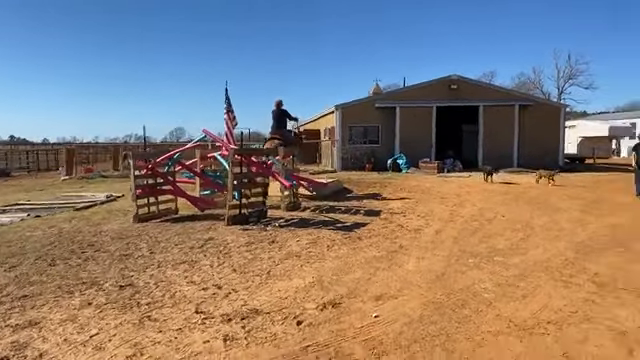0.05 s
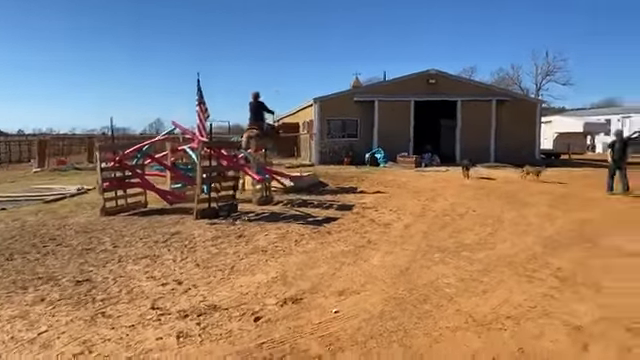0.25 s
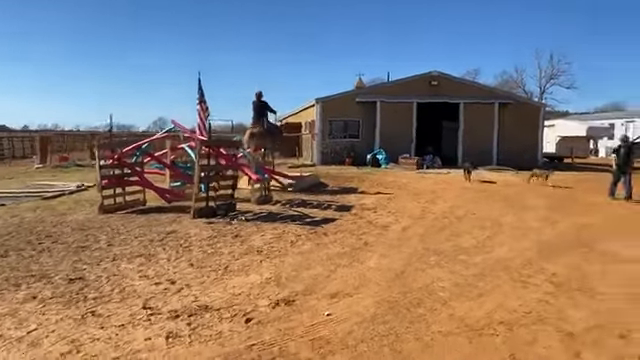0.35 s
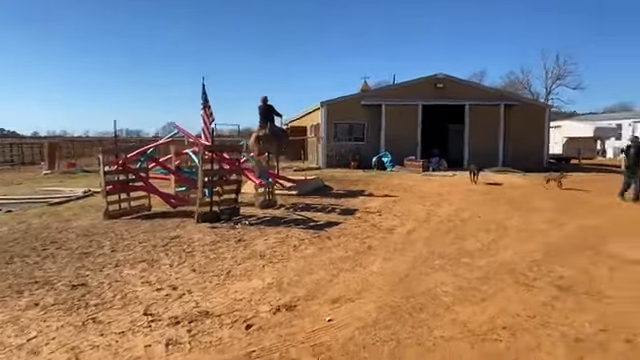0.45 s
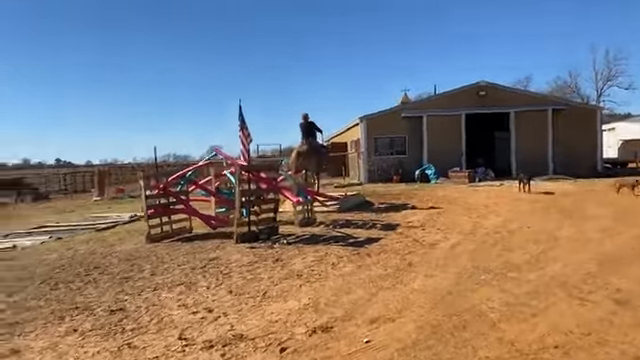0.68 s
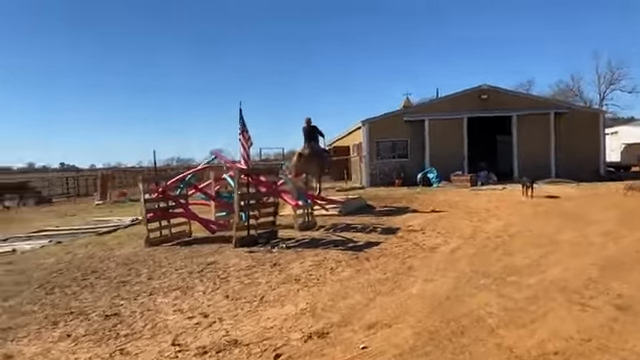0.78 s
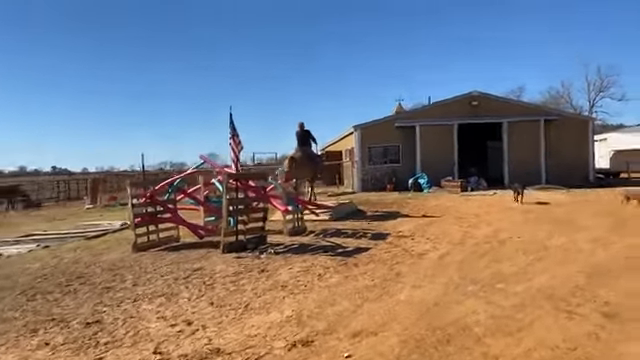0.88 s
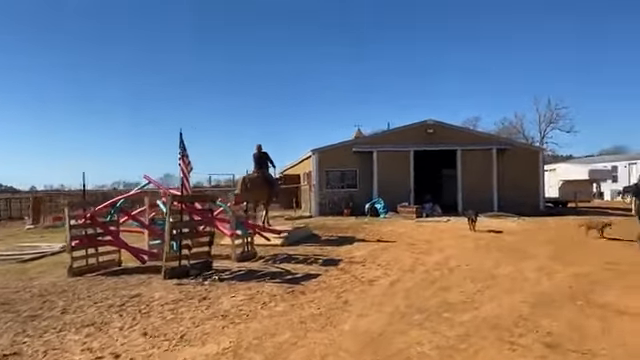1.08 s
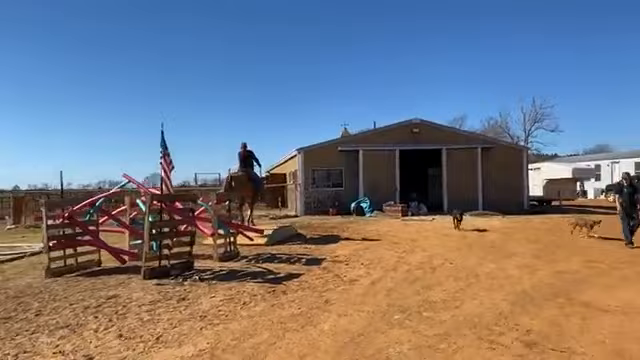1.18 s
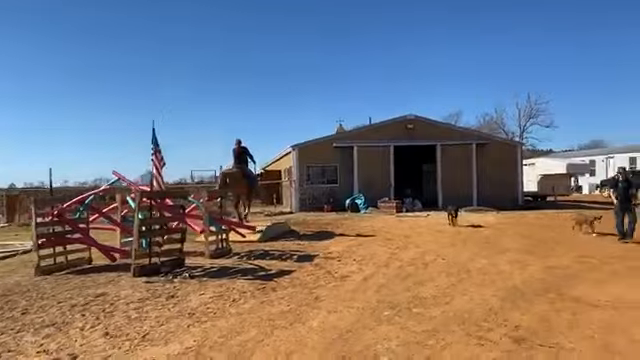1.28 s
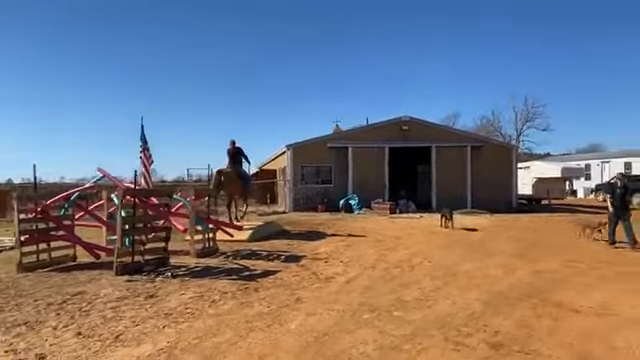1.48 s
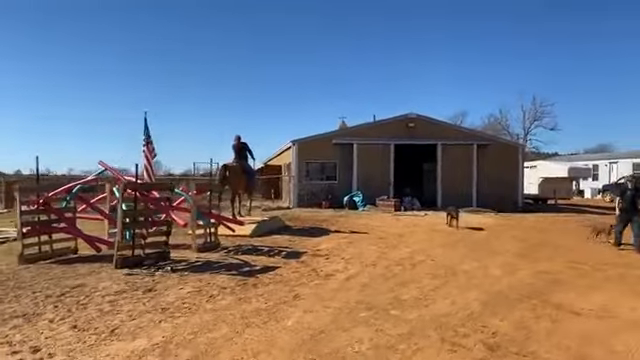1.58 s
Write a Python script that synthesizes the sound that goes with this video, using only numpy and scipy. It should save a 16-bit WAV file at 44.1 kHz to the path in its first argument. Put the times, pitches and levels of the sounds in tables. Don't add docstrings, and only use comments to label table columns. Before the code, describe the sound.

Hooves on hollow planks in an open, dry yard, heard from a distance; a strong boom comes first, weaker clustered steps follow, while tiny gear ticks, a strap snap and a light breeze sound nearer the microphone.

```python
import sys
import numpy as np
from scipy import signal
from scipy.fft import rfft, irfft
from scipy.io import wavfile

SR = 44100
rng = np.random.default_rng(int(sys.argv[2]) if len(sys.argv) > 2 else 0)


def dump(signal):
    limited = np.clip(np.atleast_2d(signal).T, -1, 1)
    pcm = np.round(limited * 32767).astype(np.int16)
    wavfile.write(sys.argv[1], SR, pcm)


def volts_from_db(level):
    exponent = np.asarray(level, float) / 20
    return 10 ** exponent


N = 72765

# (time [s], peak level [dB], pitch [Hz], swell [s], fall [s])
STEPS = [(0.239, -11, 130, 0.02, 0.0029), (.235, -16.5, 176, 0.017, 0.0044),
         (.288, -31, 208, 0.016, 0.0048), (.311, -30, 104, 0.0099, 0.019),
         (0.356, -32.5, 134.5, 0.0082, 0.016), (.396, -40, 115, 0.012, 0.01),
         (.421, -36.5, 118, 0.01, 0.011), (.452, -38.5, 119, 0.013, 0.0057),
         (0.597, -38, 263.6, 0.0087, 0.018), (0.613, -29.5, 253.3, 0.0068, 0.012),
         (0.604, -35, 121, 0.011, .008), (0.621, -29.5, 113.5, 0.0094, 0.0097),
         (0.649, -29.5, 136.5, 0.0094, 0.0033), (.662, -42.5, 244, 0.0069, .008),
         (.676, -36.5, 175.4, 0.0052, 0.0045), (.695, -39, 172, 0.0085, 0.013),
         (0.747, -40, 139, 0.013, 0.012), (0.819, -44.5, 270, 0.0097, 0.0055),
         (.838, -25, 163.5, 0.013, 0.01), (0.856, -30, 150, 0.016, 0.018), (.83, -31.5, 276, 0.012, 0.037),
         (.87, -38, 245, 0.016, 0.021), (0.924, -43, 174, 0.013, 0.016), (1.019, -55.5, 269, 0.012, 0.03),
         (1.198, -36.5, 188.4, 0.029, 0.019), (1.2, -44, 307, 0.0062, 0.014),
         (1.214, -39, 96, 0.0114, 0.022), (1.235, -40, 137, 0.01, 0.0051),
         (1.249, -36, 137, 0.0082, 0.0056), (1.284, -45.5, 130, 0.015, 0.014),
         (1.238, -39, 270.7, 0.0028, 0.028), (1.412, -38.5, 88, 0.0084, 0.009),
         (1.451, -44.5, 104, 0.012, 0.013), (1.516, -36.5, 101, 0.0087, 0.0076),
         (1.504, -39.5, 122, 0.0057, 0.0035), (1.588, -35, 322, 0.0079, 0.0028),
         (1.597, -34.5, 226, 0.0042, 0.0038), (1.599, -34, 130, 0.013, 0.0056),
         (1.611, -35.5, 239.3, 0.0112, .022), (1.623, -39, 130, 0.0097, 0.017)]
TICK_THIN_HZ = 1800


def rms_one(x):
    return x / np.sqrt(np.mean(x ** 2) + 1e-20)


def curve_db(rows):
    return np.interp(np.arange(N) / SR, *np.transpose(rows))


def drift(rate_hz):
    hop, settle = 40, 2000
    r = np.exp(-2 * np.pi * rate_hz * hop / SR)
    raw = rng.standard_normal(N // hop + settle + 2)
    slow = signal.lfilter([1], [1, -2 * r, r * r], raw)[settle:]
    return np.interp(np.arange(N) / hop, np.arange(len(slow)), rms_one(slow))


def ring(x, hz, t60):
    r = volts_from_db(-60 / (abs(t60) * SR))
    w = 2 * np.pi * hz / SR
    return signal.lfilter([0, np.sin(w)], [1, -2 * r * np.cos(w), r * r], x + 1e-18)


def ring_modes(excite, modes):
    return sum((-1) ** k * ring(excite(k), hz, t60) for k, (hz, t60) in enumerate(modes))


def thin(x):
    return signal.sosfilt(signal.butter(2, TICK_THIN_HZ, "high", fs=SR, output="sos"), x)


def coloured(spectrum, patchy_db):
    hz, db = np.transpose(spectrum)
    f = np.maximum(np.fft.rfftfreq(N, 1 / SR), 1)
    tilt_db = np.interp(np.log(f), np.log(hz), db, left=-99, right=-99)
    shaped = rfft(rng.standard_normal(N)) * volts_from_db(tilt_db)
    together = drift(0.5)
    band = np.round(2 * np.log2(f))
    out = np.zeros(N)
    for b in range(9, 29):
        flicker_db = patchy_db * (0.067 * together + drift(26.3))
        out += irfft(shaped * (band == b), N) * volts_from_db(flicker_db)
    return rms_one(out)


def chatter(times, length_s, count):
    k = np.arange(count)
    touches = rng.standard_normal((len(times), count)) * (rng.random((len(times), count)) < 0.15)
    burst = touches * np.exp(-k / (length_s * SR))
    burst[:, 0] = 0.61
    burst /= np.sqrt(np.sum(burst ** 2, axis=1, keepdims=True))
    at = (np.asarray(times) * SR).astype(int)[:, None] + k
    return lambda gains: np.bincount(at.ravel(), (burst * gains[:, None]).ravel(), N + count)[:N]


def booms():
    glide, swell_curve = 0.14, 2.01
    out = np.zeros(N + SR)
    t = np.arange(SR // 4) / SR
    for s, db, hz, swell, fall in STEPS:
        rise = np.abs(np.sin(0.5 * np.pi * t / swell)) ** swell_curve
        decay = np.exp(-np.maximum(t - swell, 0) / fall)
        shape = np.where(t < swell, rise, decay)
        cycles = hz * (t + glide * swell * (1 - np.exp(-t / swell)))
        start = int(s * SR)
        out[start:start + len(t)] += volts_from_db(db) * shape * np.sin(2 * np.pi * cycles)
    return out[:N]


def rumble():
    # (pitch [Hz], width [Hz], level [dB])
    deck_modes = [(89, 3.3, -10), (130, 79, -7.5), (169, 60, 0), (198, 47, -2.5), (245, 157, -0.5),
                  (270, 93, -19.5), (385.3, 44, -11.5), (600, 270, -24), (820, 110, -27)]
    below_boom_db, t60_s, rise_s = -16, 0.31, 0.0019
    t = np.arange(N) / SR
    power = np.zeros(N)
    for s, db, *_ in STEPS:
        age = np.maximum(t - s, 0)
        onset = 1 - np.exp(-(age / rise_s) ** 2)
        power += (volts_from_db(db + below_boom_db - 60 * age / t60_s) * onset) ** 2
    deck = np.zeros(N)
    for hz, width, db in deck_modes:
        once = ring(rng.standard_normal(N), hz, 2.5 / width)
        deck += volts_from_db(db) * rms_one(ring(once, hz, 1.5 / width))
    return np.sqrt(power) * rms_one(deck) * volts_from_db(3.0 * drift(14))


def knocks():
    # (time [s], peak level [dB], low note [Hz], high note [Hz], crack level [dB])
    contacts = [(.231, -41.5, 306, 376.4, -21.5), (0.235, -41, 1030, 1172, -3.5),
                (.2345, -53.5, 2130, 3580, -36), (.2875, -50, 600, 471, -6), (.5945, -43, 577, 924, -7),
                (.612, -36.5, 572, 919, -14.5), (.626, -46, 542, 853, -15), (0.823, -61, 428, 2350, 3),
                (.8355, -47, 600, 825, -2.5), (.836, -53, 1700, 2350, -5), (1.196, -51, 600, 945, -4),
                (1.428, -49.5, 386, 612, -4), (1.484, -55.5, 680, 1540, -10), (1.512, -56, 448, 614, -10),
                (1.552, -68, 500, 1190, 6), (1.586, -43, 593, 818, -7), (1.591, -58.5, 1340, 1660, 6.5),
                (1.594, -56, 2340, 3110, -17)]
    # (pitch [Hz], level [dB], t60 [s])
    crack_modes = [(994, 0.5, 0.028), (1063, -3.5, 0.057), (1153, 1.5, 0.014), (1400, -5.5, 0.037),
                   (1728, -13, 0.09), (2350, -3, 0.015), (3430, -2.5, 0.0054), (3610, -16.5, 0.02),
                   (4700, -7.5, 0.0029)]
    note_cycles, rise_cycles, contact_hz = 34, 4.34, 5500
    s, db, low_hz, high_hz, crack_db = np.transpose(contacts)
    mode_hz, mode_db, mode_t60 = np.transpose(crack_modes)
    strike = chatter(s, 0.004, count=600)
    luck_db = rng.normal(0, 2, (len(s), len(crack_modes)))
    out = ring_modes(lambda k: strike(volts_from_db(db + crack_db + mode_db[k] + luck_db[:, k])),
                     zip(mode_hz, mode_t60))
    for k, one in enumerate(np.eye(len(s))):
        hit = np.bincount((s * SR).astype(int), one * volts_from_db(db + 2.0), N)
        for hz, sign in ((low_hz[k], 1), (high_hz[k], -1)):
            out = out + sign * (ring(hit, hz, note_cycles / hz) - ring(hit, hz, rise_cycles / hz))
    return signal.sosfilt(signal.butter(2, contact_hz, fs=SR, output="sos"), out)


def scrapes():
    # (time [s], length [s], level [dB])
    drags = [
        (.4, .1, -76),
        (1.195, 0.12, -65),
        (1.385, 0.064, -76),
    ]
    board_hz, t60_s = 2310, 0.0084
    t = np.arange(N) / SR
    stroke = np.zeros(N)
    for s, length, db in drags:
        stroke += volts_from_db(db) * np.interp(t, [s, s + 0.17 * length, s + length], [0, 1, 0])
    rub = ring(rng.standard_normal(N), board_hz, t60_s)
    return stroke * rms_one(ring(rub, board_hz, t60_s))


def ticks():
    # (time [s], middle level [dB], dull level [dB], bright level [dB], dull note [Hz])
    clicks = [(.0004, -59, -49, -67, 1160), (.0285, -74, -46, -73, 2660), (0.03, -55, -39, -42, 1180),
              (.046, -52.5, -57.5, -50, 2300), (0.0552, -74, -48, -75, 2530), (0.0586, -79, -48, -80, 1710),
              (.06, -81, -50, -80, 1270), (.0715, -78, -61, -80, 1500), (0.0752, -71, -49, -73, 2330),
              (0.091, -48, -46, -72, 1940), (0.0929, -53, -39.5, -44.5, 1280), (.1093, -51, -51, -60, 1520),
              (0.111, -57, -56, -70, 1200), (0.131, -78, -56, -79.5, 1890), (0.1325, -72, -51, -79, 2600),
              (.135, -68, -44, -80, 1900), (.141, -64, -47, -82, 1370), (0.1378, -44.5, -43.5, -57, 1720),
              (0.1486, -46, -51, -55.5, 3330), (.159, -58, -56, -85, 2000), (0.1614, -58, -74, -80.5, 1800),
              (0.2746, -48, -43, -47.5, 2320), (0.3427, -69, -70, -64, 1220), (1.068, -54, -74, -70, 2360),
              (1.2772, -58, -72, -70, 2400), (1.3103, -71, -72, -53, 2400), (0.277, -61, -60, -53, 4700),
              (1.3372, -57, -60, -60, 3500), (1.344, -54, -47, -57, 4320), (1.366, -56, -74, -49, 2400),
              (1.3685, -53, -52, -73, 3000), (1.5044, -54, -56, -56, 4800), (1.509, -54, -52, -57, 4760),
              (1.513, -59, -76, -63, 2000), (1.5457, -62, -70, -60, 1400)]
    # (pitch [Hz], t60 [s], level [dB])
    middle_modes = [(3000, 0.003, 0.1), (3960, 0.0039, 0.1), (4700, 0.0023, 0.11)]
    # (pitch [Hz], t60 [s], level [dB])
    bright_modes = [(7380, 0.0019, 4.5), (8600, 0.00067, 3), (10700, .0015, -16), (14800, 0.0012, -18)]
    dull_cycles = 9
    s, middle_db, dull_db, bright_db, dull_hz = np.transpose(clicks)
    strike = chatter(s, 0.0007, count=250)
    dull = np.zeros(N)
    for one, hz in zip(np.eye(len(s)), dull_hz):
        dull += ring(strike(one * volts_from_db(dull_db)), hz, dull_cycles / hz)
    hard = np.zeros(N)
    for modes, part_db in ((middle_modes, middle_db), (bright_modes, bright_db)):
        mode_hz, mode_t60, mode_db = np.transpose(modes)
        luck_db = rng.normal(0, 1.5, (len(s), len(modes)))
        hard += ring_modes(lambda k: strike(volts_from_db(part_db + mode_db[k] + luck_db[:, k])),
                           zip(mode_hz, mode_t60))
    return dull + thin(hard)


def snap():
    snap_times = [
        1.3315,
        1.334,
    ]
    # (pitch [Hz], first snap level [dB], second snap level [dB], t60 [s])
    strap_modes = [(2820, -40.5, -53, 0.004), (3750, -37, -49, 0.0025), (5020, -43, -39, 0.0043),
                   (6600, -47, -43, 0.0026), (7830, -49, -39.5, .006), (11200, -58, -61, 0.0018),
                   (14600, -54, -49, .003)]
    at = (np.array(snap_times) * SR).astype(int)
    mode_hz, first_db, second_db, mode_t60 = np.transpose(strap_modes)
    return thin(ring_modes(lambda k: np.bincount(at, volts_from_db([first_db[k], second_db[k]]), N),
                           zip(mode_hz, mode_t60)))


def breeze():
    # (time [s], level [dB])
    rustle_level = [(0, -78.5), (.2, -79.5), (.3, -72), (.38, -79), (.45, -71.5), (.52, -76.5), (1.17, -77),
                    (1.21, -72), (1.4, -64.5), (1.5, -68.5), (1.56, -78), (1.65, -70.5)]
    # (frequency [Hz], level [dB per Hz])
    rustle_spectrum = [(1300, -12), (1700, -5), (2100, -1.5), (2300, -2.1), (2500, -2.5), (3200, -5.5),
                       (6000, -35), (8000, -54)]
    # (time [s], level [dB])
    hiss_level = [(0, -84), (.2, -83), (.58, -82), (1.17, -75), (1.21, -73.5), (1.4, -73), (1.48, -77.5),
                  (1.505, -71), (1.57, -77), (1.65, -74)]
    # (frequency [Hz], level [dB per Hz])
    hiss_spectrum = [(2350, -9), (4000, -5), (6460, -8.5), (7750, -8.5), (9620, -10.5), (10500, -13),
                     (14900, -15), (16200, -11)]
    rustle = volts_from_db(curve_db(rustle_level)) * coloured(rustle_spectrum, patchy_db=3.0)
    hiss = volts_from_db(curve_db(hiss_level)) * coloured(hiss_spectrum, patchy_db=1.74)
    return rustle + hiss


def outdoor_hum():
    # (time [s], level [dB])
    hum_level = [(0.0, -53.5), (0.192, -61), (0.344, -60), (0.484, -55.5), (0.676, -56), (0.812, -58),
                 (0.992, -54.5), (1.276, -61), (1.36, -62.5), (1.45, -54.5), (1.54, -56), (1.575, -61.5)]
    # (frequency [Hz], level [dB per Hz])
    hum_spectrum = [(18, -37), (30, -7.5), (119, -0.5), (220, -7), (302, -14), (400, -22.5), (520, -70.5),
                    (880, -120)]
    # (frequency [Hz], level [dB per Hz])
    yard_spectrum = [(210, -37.5), (350, -6), (529, -1.5), (1220, -6), (1600, -18), (2080, -59),
                     (3520, -120)]
    hum = volts_from_db(curve_db(hum_level) + 3) * coloured(hum_spectrum, patchy_db=3)
    yard = volts_from_db(-71.5 + 2.5) * coloured(yard_spectrum, patchy_db=1.5)
    return hum + yard


def scene():
    bridge = booms() + rumble() + knocks() + scrapes()
    gear = ticks() + snap()
    air = breeze() + outdoor_hum()
    return (bridge + gear + air)[None]


def roll_off(x):
    return signal.sosfilt(signal.butter(12, 16460, fs=SR, output="sos"), x)


def record(dry):
    x = signal.sosfilt(signal.butter(6, 58, "high", fs=SR, output="sos"), dry)
    x = signal.sosfilt(signal.cheby2(10, 50, 16650, fs=SR, output="sos"), x)
    mix = x * np.minimum(np.arange(N)[::-1] / (0.003 * SR), 1)
    return roll_off(mix)


dry = scene()
out = record(dry)
dump(out)
```